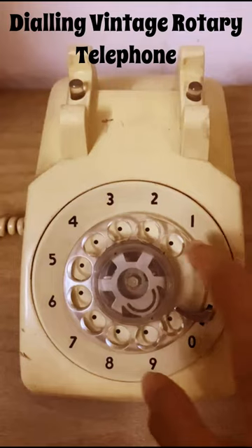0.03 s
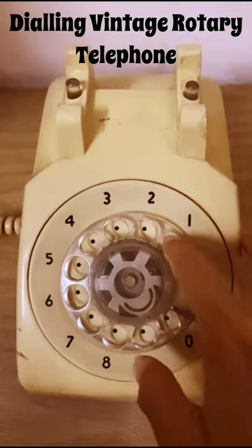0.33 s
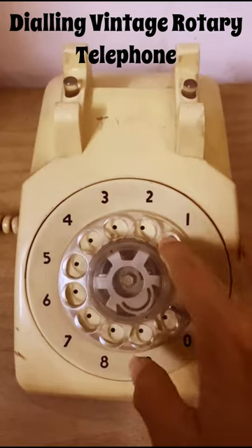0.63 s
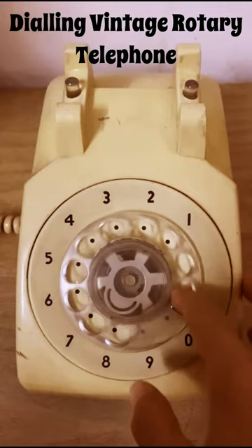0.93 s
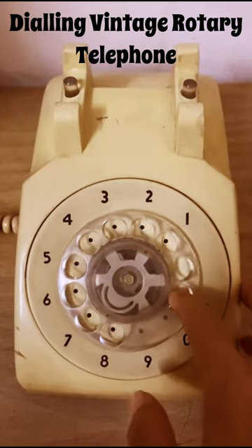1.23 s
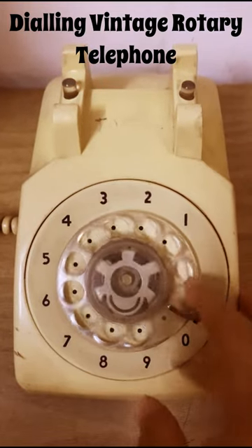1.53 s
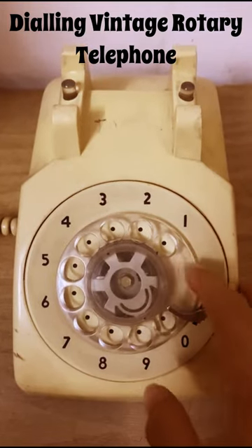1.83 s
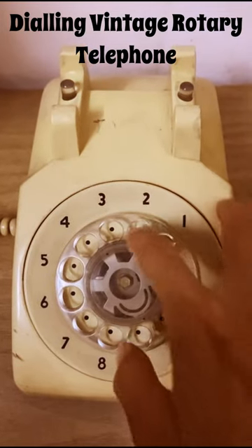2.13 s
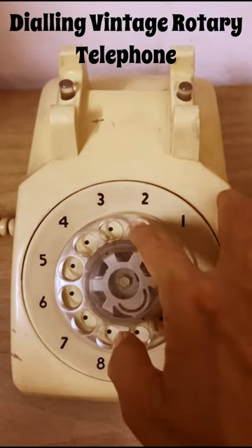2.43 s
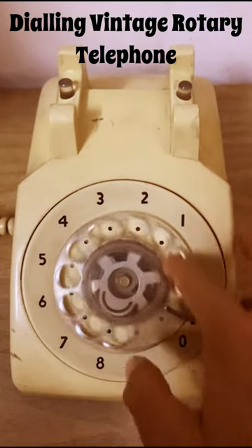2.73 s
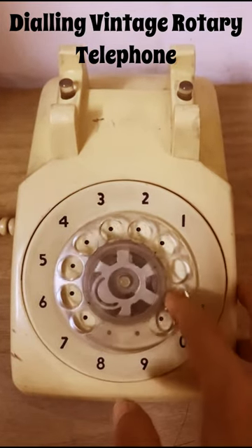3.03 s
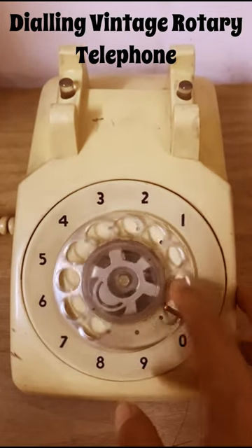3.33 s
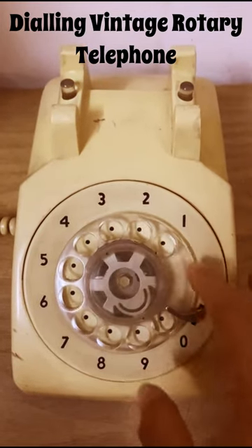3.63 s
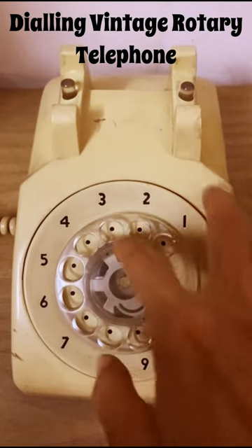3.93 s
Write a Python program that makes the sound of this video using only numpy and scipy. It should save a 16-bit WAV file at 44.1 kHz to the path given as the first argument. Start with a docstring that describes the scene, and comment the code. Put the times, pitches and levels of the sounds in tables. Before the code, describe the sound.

A rotary telephone is dialed twice, close up. A finger winds the dial with a scraping ratchet and clicks from about 0.7 to 1 second. It whirrs back from 1.4, ending at 1.7 in a hollow thump and short metal rattle. The second wind runs from 2.5 to 3 seconds, and the return from 3.3 thumps home at 3.7. A low room hum continues underneath.

```python
"""A finger winds the dial of a rotary telephone to the stop with a scraping ratchet and lets go, twice.
Each time the gears whirr back under the governor and end in a thump and a short metal rattle.
The plastic shell booms, a contact spring snaps and the bells ring faintly with the shaking works.
The telephone stands on a wooden table, close to a pair of microphones, in a room with a low hum."""
import sys
import numpy as np
from scipy import signal
from scipy.fft import rfft, irfft, next_fast_len
from scipy.io import wavfile
from scipy.ndimage import map_coordinates

SR = 44100
rng = np.random.default_rng(int(sys.argv[2]) if len(sys.argv) > 2 else 0)


def waveform_to_disk(signal):
    """Save audio, clipped to [-1, 1], as 16-bit WAV at the path in sys.argv[1]."""
    frames = np.transpose(np.atleast_2d(signal))
    scaled = np.clip(frames, -1, 1) * 32767
    samples = np.round(scaled).astype(np.int16)
    wavfile.write(sys.argv[1], SR, samples)


N = 176400


def gears(wind, back):
    """Both strokes shake case and shell; winding scrapes the finger wheel, the return rings the frame."""
    # resonances of each part (frequency [Hz], gain [dB])
    case_colour = [(120, -51), (195, -20), (222, -9), (232, -1), (241, -5), (249, -4.5), (268, -22),
                   (296, -18), (350, -52.5), (600, -57.5)]
    shell_colour = [(200, -23), (330, 0), (385, -7.5), (450, -0.5), (560, -2), (680, -10.5), (880, -15.5),
                    (975, 2), (1060, -1.5), (1220, -21), (1370, -10.5), (1500, -35), (2500, -30.5)]
    wheel_colour = [(900, -1.5), (1500, -6.5), (1700, 6.5), (2100, 7.5), (2450, 2.5), (2850, 5), (3280, 0),
                    (3500, -13), (3950, -25), (4400, -8), (4700, -18), (6000, -29)]
    scrape_colour = [(2000, -31), (3300, 9), (3950, -6.5), (4200, -5), (4330, 9), (4480, 14.5), (4650, 0),
                     (5100, 0), (5600, -2.5), (6400, 5.5), (7600, 1.5), (8600, 0), (9700, -29),
                     (10750, 5.5), (11400, -8.5), (12500, -33.5)]
    frame_colour = [(900, -3.5), (1480, -3.5), (1700, 7), (1900, 6.5), (2080, 6), (2260, 6.5), (2420, 0),
                    (2750, 0.5), (3150, 2), (3450, -26), (3950, -19), (6000, -26.5)]
    whirr_colour = [(2000, -30.5), (3400, 6.5), (3980, -15), (4300, 3), (4600, 8), (4950, 1), (5600, 3.5),
                    (6400, 5.5), (7600, 2), (8600, -1), (9700, -18.5), (11300, -0.5), (12500, -31.5)]
    case, shell = np.hypot(wind[:2], back[:2])
    case = np.minimum(case, amp(-36.5))  # the gears drive the boom no harder than this
    parts = [(case, case_colour), (shell, shell_colour),
             (wind[2], wheel_colour), (wind[3], scrape_colour),
             (back[2], frame_colour), (back[3], whirr_colour)]
    return sum(coloured(teeth() * drive, colour) for drive, colour in parts)


def teeth(per_s=2400, scatter_db=3):
    """Gear teeth and other small contacts: dense tiny impacts of uneven size, rms 1."""
    hit = rng.random(N) < per_s / SR
    polarity = np.sign(rng.standard_normal(N))
    size = amp(scatter_db * np.clip(rng.standard_normal(N), -2, 2))
    return unit(hit * polarity * size)


def dial_drives(governor_hz=57):
    """Winding scrapes and clicks unevenly; the return flutters with each turn of the governor."""
    # gear noise, one list a stroke (time [s], gear level [dB], treble level [dB])
    winds = [
        [(0.66, -57.5, -72), (0.706, -71, -80), (0.738, -49.5, -63), (0.78, -47.5, -68), (0.852, -41.5, -60),
         (0.868, -51, -45), (0.876, -41, -49.5), (0.948, -44, -50.5), (1.008, -38.5, -43), (1.122, -68.5, -96),
         (1.14, -68, -119)],
        [(2.44, -66, -87), (2.472, -62, -71), (2.506, -66, -79), (2.538, -52, -67), (2.582, -47.5, -71),
         (2.628, -45, -55.5), (2.66, -50, -45), (2.678, -44, -56), (2.82, -42.5, -46), (2.926, -38, -46.5),
         (3.05, -66.5, -89)],
    ]
    returns = [
        [(1.36, -64.5, -99), (1.39, -61, -83), (1.404, -44, -78), (1.418, -52.5, -82), (1.526, -41, -74),
         (1.582, -39, -49.5), (1.65, -38, -61), (1.698, -33, -46.5), (1.714, -26.5, -42), (1.752, -42.5, -40),
         (1.812, -47, -71.5), (1.9, -60.5, -72)],
        [(3.25, -58, -86), (3.272, -61, -78), (3.286, -53, -84), (3.404, -38.5, -64), (3.442, -38, -48),
         (3.506, -34, -53.5), (3.652, -33.5, -49.5), (3.668, -35, -38.5), (3.676, -25, -44),
         (3.724, -36.5, -46), (3.786, -52, -72), (3.86, -54.5, -85)],
    ]
    # gains on those curves (case [dB], shell [dB], metal [dB], treble [dB])
    wind_mix = [-2.5, -1, -11.5, -5]
    return_mix = [5.5, -6, -12, -1]
    governor = sine(governor_hz * (1 + 0.0802 * wobble(12)))
    wind = stroke_drive(winds, wind_mix, flutter_db=2.2 * wobble(110))
    back = stroke_drive(returns, return_mix, flutter_db=1.8 * governor + 0.87 * wobble(200))
    return np.hypot(wind, click_drive()), back


def stroke_drive(strokes, mix_db, flutter_db):
    """How hard the turning gears drive case, shell, metal and treble: one envelope each."""
    t, drive = clock(), np.zeros((4, N))
    for rows in strokes:
        times, gear_db, treble_db = np.transpose(rows)
        gate = np.clip(np.minimum(t - times[0], times[-1] - t) / .02 + 1, 0, 1)
        drive += gate * amp([np.interp(t, times, db) for db in (gear_db, gear_db, gear_db, treble_db)])
    return drive * amp(mix_db)[:, None] * amp(flutter_db)


def click_drive(attack_s=0.0003, t60_s=0.071):
    """Envelopes for the clicks, each a brief chatter of contacts that dies fast."""
    # pawl, finger wheel and fingernail (time [s], metal [dB], shell [dB], treble [dB])
    clicks = [(0.2415, -43.5, -48, -69), (0.7467, -50, -40, -74), (0.7923, -34.5, -54, -61),
              (0.881, -28, -33.5, -42), (0.912, -34, -50, -53), (0.9743, -38, -32, -42),
              (1.0005, -26, -32, -46), (1.0271, -31, -34, -58), (1.3934, -44, -37, -76),
              (1.488, -40, -34.5, -65), (1.5553, -35, -58, -45), (1.8134, -33, -41, -59),
              (2.048, -44.5, -77, -60), (2.2392, -44.5, -38, -57.5), (2.2685, -45, -42, -65),
              (2.3045, -47, -50.5, -71), (2.5305, -45.5, -60, -59.5), (2.632, -30, -33.5, -47.5),
              (2.667, -33, -43, -43), (2.7656, -32.5, -33, -44), (2.8283, -27.5, -50, -44),
              (2.9092, -23.5, -41.5, -41), (3.3268, -42.5, -37, -67), (3.4208, -42, -33, -45),
              (3.6628, -26.5, -29, -44), (3.7728, -33, -37.5, -64)]
    # gains on every click (case [dB], shell [dB], metal [dB], treble [dB])
    click_mix = [-3.5, -4.5, -13, -4]
    drive, t = np.zeros((4, N + SR)), np.arange(SR // 8) / SR
    shape = (1 - np.exp(-t / attack_s)) * amp(-60 * t / t60_s)
    shape /= shape.max()
    for start, metal_db, shell_db, treble_db in clicks:
        gains = amp([shell_db, shell_db, metal_db, treble_db])
        drive[:, round(start * SR):][:, :len(t)] += gains[:, None] * shape
    return drive[:, :N] * amp(click_mix)[:, None]


def thumps():
    """Soft blows ring the hollow case."""
    # the finger pushing or letting go, the dial hitting its rest (time [s], level [dB], attack [s])
    blows = [(0.697, -38, 0.0076), (1.003, -43.5, 0.011), (1.398, -33.5, 0.021), (1.708, -17.5, 0.014),
             (2.472, -29, 0.018), (3.266, -33.5, 0.0082), (3.674, -20.5, 0.0063)]
    # modes of the case (frequency [Hz], level [dB], t60 [s])
    case_modes = [(233.2, -5.5, 0.4), (247.5, -2.5, 0.094), (426, -3, 0.018), (485, 6, 0.041),
                  (532, -17, 0.085)]
    t, out = np.arange(SR // 2) / SR, np.zeros(N + SR)
    for start, db, attack_s in blows:
        out[round(start * SR):][:len(t)] += amp(db) * (1 - np.exp(-t / attack_s)) * ring(case_modes, t)
    return out[:N]


def shake(attack_s=0.0052, t60_s=0.023):
    """Envelope of the works, which spin and chatter on for a moment once the dial is at rest."""
    # one burst after each return (time [s], length [s], level [dB])
    bursts = [(1.721, 0.051, -33.5), (3.694, 0.047, -35)]
    t, envelope = clock(), np.zeros(N)
    for start, length_s, db in bursts:
        rise = np.clip((t - start) / attack_s, 0, 1)
        envelope += rise * amp(db - 60 * np.maximum(t - start - length_s, 0) / t60_s)
    return envelope


def rattle():
    """Dry metal contacts in the shaking works."""
    # resonances of the works (frequency [Hz], gain [dB])
    works_colour = [(600, -15), (1500, -12.5), (2000, -2.5), (2280, 6.5), (2750, 0.5), (3250, 2.5),
                    (3950, -16), (4480, -8.5), (5000, -16), (6500, -11), (8300, -14), (12000, -41)]
    return amp(-0.5) * coloured(teeth() * shake(), works_colour)


def spring(chatter_s=0.0022):
    """The contact spring chatters for a few milliseconds and rings brightly."""
    # a bright metallic snap partway through each wind and each return (time [s], level [dB])
    snaps = [(0.864, -34.5), (1.583, -42.5), (2.652, -37), (2.7, -42.5), (3.4444, -37)]
    # modes of the spring (frequency [Hz], level [dB], t60 [s])
    spring_modes = [(4750, -4.5, 0.022), (4900, -11.5, 0.006), (5630, -3, .012), (6420, 0.5, 0.023),
                    (6920, -6, 0.0064), (7800, -5.5, 0.011), (8750, 7, 0.006), (10600, -6, 0.017)]
    chatter = np.zeros(N)
    for start, db in snaps:
        age = np.maximum(clock() - start, 0) / chatter_s
        chatter += amp(db) * age * np.exp(1 - age)
    ping = ring(spring_modes, np.arange(SR // 16) / SR)
    return signal.fftconvolve(teeth() * chatter, ping / np.linalg.norm(ping))[:N]


def fingertip():
    """Skin brushes the finger wheel before each wind; pressed hard, the hub drags with a hollow rub."""
    # the finger settling in its hole, the hub dragging (centre time [s], length [s], level [dB])
    brushes = [(0.43, 0.29, -74), (2.072, 0.074, -62.5), (2.29, 0.14, -71.5)]
    drags = [(.93, 0.083, -47.5), (2.87, 0.18, -42)]
    # spectra of the two rubs (frequency [Hz], gain [dB])
    skin_colour = [(800, 2), (2400, 3.5), (3200, 0.5), (3950, -10.5), (4420, 2), (5000, -14.5), (7000, -5),
                   (11500, -10.5)]
    hub_colour = [(260, -15), (295, -6), (350, -18.5), (430, -0.5), (490, 8), (560, -20), (700, -22)]
    return rubbing(brushes, skin_colour) + rubbing(drags, hub_colour)


def rubbing(rubs, colour):
    """Uneven friction that swells and fades."""
    touch = sum(amp(db) * np.exp(-(2 * (clock() - centre) / length) ** 4) for centre, length, db in rubs)
    return coloured(teeth() * touch * amp(1.3 * wobble(40)), colour)


def bells(wind, back, waver_rad=0.5):
    """Each metal mode gathers energy from the shaking works and rings on with its own decay."""
    # modes of the bells and steel frame (frequency [Hz], level [dB], t60 [s])
    bell_modes = [(1892, -19, .13), (2278, -14, .14), (2450, -24, .1), (2584, -19, .13), (2751, -15, .14),
                  (3107, -23, .15), (3289, -26, .14), (3704, -20, .12), (4457, -20, .14), (4755, -25, .08),
                  (5636, -27, .12), (6438, -28, .1), (6912, -27, .12), (7779, -30, .12)]
    power = (amp(-1) * wind[2]) ** 2 + (amp(-2.5) * back[2]) ** 2 + shake() ** 2
    out = np.zeros(N)
    for hz, db, t60 in bell_modes:
        retained = np.exp(-2 * np.log(1000) / (t60 * SR))
        energy = signal.lfilter([1 - retained], [1, -retained], power)
        level = amp(db + 2 * wobble(12)) * np.sqrt(2 * energy)
        out += level * np.sin(2 * np.pi * hz * clock() + waver_rad * wobble(45))
    return amp(1) * out


def room(x, walls_t60_s=.03):
    """Table and near walls answer at once, then a short tail; both differ between the microphones."""
    # decay of the room (frequency [Hz], t60 [s])
    decay = [(200, 0.46), (1000, 0.53), (4000, 0.11), (10000, 0.2)]
    # colour of the reflections (frequency [Hz], gain [dB])
    colour = [(240, -6), (650, 1), (1000, -2), (3500, 2), (6500, -6)]
    hz, t, noise = signal.stft(rng.standard_normal((2, SR // 2)), SR, nperseg=256)
    tail = signal.istft(noise * amp(-60 * t / along(decay, hz)[:, None]), SR, nperseg=256)[1]
    walls = rng.standard_normal(tail.shape) * amp(-60 * np.arange(tail.shape[1]) / SR / walls_t60_s)
    response = amp(-34) * tail / np.linalg.norm(tail[0]) + amp(-14) * walls / np.linalg.norm(walls[0])
    return equalised(signal.fftconvolve(x[None], response, axes=1)[:, :N], colour)


def hum(hz, waver_hz):
    """A tone of wandering pitch, rms 1."""
    return np.sqrt(2) * sine(hz + waver_hz * wobble(7))


def room_tone():
    """Wavering hums in the centre, over a low rumble whose faint hiss spreads wider."""
    # two low hums swell and fade (time [s], lower hum [dB], upper hum [dB])
    swells = [(0.1, -30.5, -37), (0.15, -24.5, -30.5), (0.25, -35, -35), (0.8, -36, -33.5),
              (1.18, -32, -42), (1.24, -25.5, -57), (1.39, -32, -43), (1.66, -37.5, -39),
              (1.91, -32.5, -37.5), (2.29, -47.5, -41.5), (2.49, -30.5, -53), (2.82, -32, -48),
              (3.17, -32, -42.5), (3.22, -31.5, -52.5), (3.95, -34.5, -35), (3.98, -56, -31)]
    # weaker hums above them (frequency [Hz], level [dB])
    faint_hums = [(166, -55.5), (140.7, -59.5)]
    # spectrum of the rumble, and its stereo width (frequency [Hz], gain [dB])
    rumble_colour = [(20, -15.5), (38, -8.5), (62, 3.5), (90, -11.5), (150, -11), (230, -21.5), (300, -25),
                     (400, -34.5), (800, -38), (1900, -45), (3200, -61.5), (5000, -72), (7000, -58),
                     (9700, -78.5), (11500, -64.5)]
    width = [(50, -28.5), (150, -10.5), (500, 7), (2000, 2.0), (7000, -1.5)]
    times, lower_db, upper_db = np.transpose(swells)
    lower = amp(np.interp(clock(), times, lower_db)) * hum(hz=50.6, waver_hz=1.655)
    upper = amp(np.interp(clock(), times, upper_db)) * hum(hz=82.5, waver_hz=0.897)
    faint = sum(amp(db + 2.65 * wobble(3.71)) * hum(hz, waver_hz=1.45) for hz, db in faint_hums)
    mid, side = (coloured(rng.standard_normal(N), rumble_colour) for _ in range(2))
    mid = mid * amp(0.63 * wobble(10))
    side = equalised(side, width)
    return amp(-3) * (lower + upper) + faint + amp(-40) * np.array([mid + side, mid - side])


def amp(db):
    """Decibels to gain."""
    return 10 ** (np.asarray(db) / 20)


def unit(x):
    """Scale to rms 1."""
    return x / np.sqrt(np.mean(x ** 2) + 1e-20)


def along(points, hz):
    """Interpolate (frequency [Hz], value) points on a log frequency axis."""
    knots_hz, values = np.transpose(points)
    return np.interp(np.log(hz + 1), np.log(knots_hz + 1), values)


def clock():
    """The time of each sample in seconds."""
    return np.arange(N) / SR


def wobble(rate):
    """A smooth random curve, rate knots a second."""
    return map_coordinates(rng.standard_normal(int(N * rate / SR) + 4), [clock() * rate])


def sine(hz):
    """A sine that follows a frequency curve."""
    return np.sin(2 * np.pi * np.cumsum(hz) / SR)


def ring(modes, t):
    """Damped sines from a table of modes."""
    return sum(amp(db - 60 * t / t60) * np.sin(2 * np.pi * hz * t) for hz, db, t60 in modes)


def filtered(x, response):
    """x through a complex response of frequency."""
    size = next_fast_len(N + SR // 2)
    return irfft(rfft(x, size) * response(np.fft.rfftfreq(size, 1 / SR)), size)[..., :N]


def equalised(x, points):
    """x through a zero-phase curve of (frequency [Hz], gain [dB]) points."""
    return filtered(x, lambda hz: amp(along(points, hz)))


def coloured(x, points, size=8192):
    """x through a causal filter of unit energy; the colour falls away beyond its end points."""
    hz = np.fft.rfftfreq(size, 1 / SR) + 1
    octaves_outside = np.abs(np.log2(hz / np.clip(hz, points[0][0], points[-1][0])))
    cepstrum = irfft(np.log(amp(along(points, hz) - 20 * octaves_outside)))
    cepstrum[1:size // 2] *= 2  # fold to minimum phase
    cepstrum[size // 2 + 1:] = 0
    impulse = irfft(np.exp(rfft(cepstrum)))
    return signal.fftconvolve(x, impulse / np.linalg.norm(impulse))[:N]


def scene():
    """The telephone at two close microphones, with the room behind it."""
    # each microphone hears partly different contacts (frequency [Hz], unshared part [dB])
    spread = [(240, -16), (450, -7), (720, -3), (1000, -9), (1450, -5), (2000, -7), (3600, -4), (4500, -6),
              (6500, -12), (11000, -14)]
    # phase between the microphones (frequency [Hz], left lead [rad])
    lead = [(100, .1), (230, .55), (380, .6), (560, -.1), (850, -1.2), (1050, -.6), (1900, .5), (2800, .9),
            (3400, 3.6), (4100, 5.8), (4550, 7.4), (5000, 9.5), (6100, 12.4), (7900, 12.6), (8800, 15.2),
            (10600, 15.9), (11500, 18.8)]
    # balance between them (frequency [Hz], left minus right [dB])
    pan = [(100, 0), (260, -1), (450, 1.5), (620, 2), (1000, -5.5), (1400, -2.5), (2000, -5.5),
           (2800, -3.5), (4400, -3.5), (6000, -1.5), (8000, 0)]
    wind, back = dial_drives()
    phone = gears(wind, back) + rattle() + thumps() + spring() + fingertip() + bells(wind, back)
    sides = np.array([[.5], [-.5]])  # left, right
    unshared = equalised(gears(wind, back) + rattle(), spread)
    direct = filtered(phone + 2 * sides * unshared, lambda hz: np.exp(1j * sides * along(lead, hz)))
    return filtered(direct + room(phone), lambda hz: amp(sides * along(pan, hz))) + room_tone()


def record(dry, start_s=0.077, top_hz=12400):
    """Sound begins after a moment of silence; nothing is kept above the band limit."""
    fade_in = np.clip((clock() - start_s) / 0.0033, 0, 1)
    return filtered(dry * fade_in, lambda hz: hz < top_hz)


dry = scene()
out = record(dry)
waveform_to_disk(out)
```